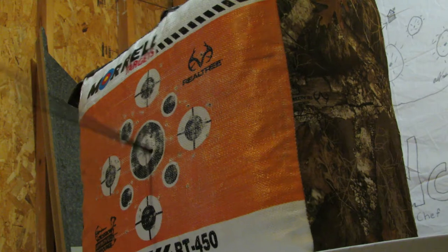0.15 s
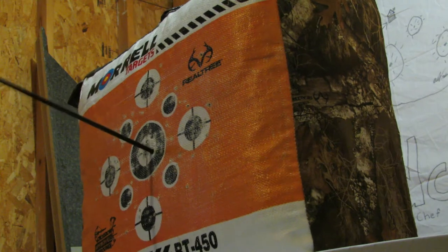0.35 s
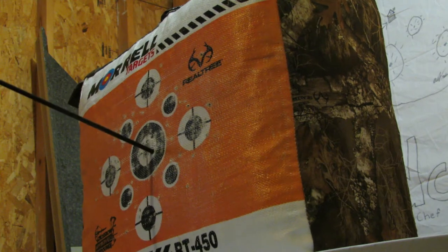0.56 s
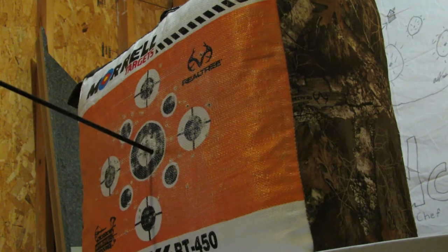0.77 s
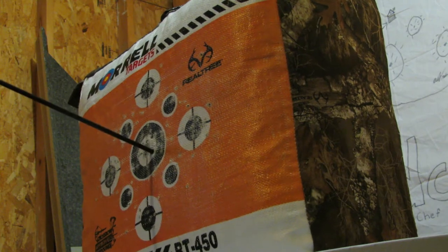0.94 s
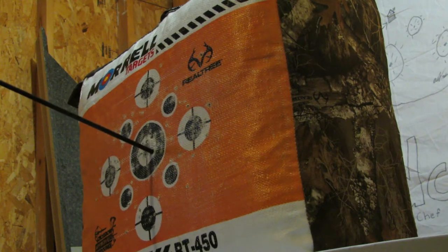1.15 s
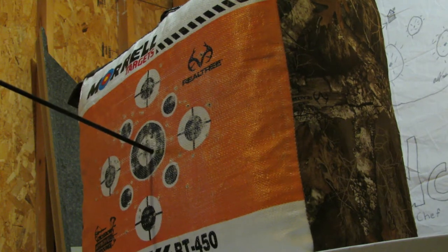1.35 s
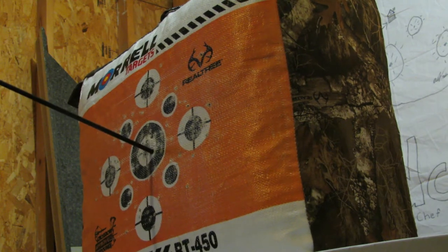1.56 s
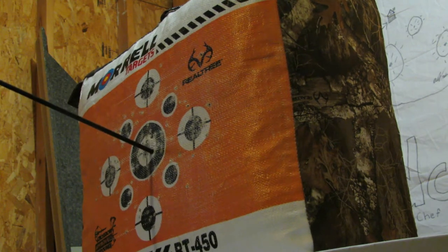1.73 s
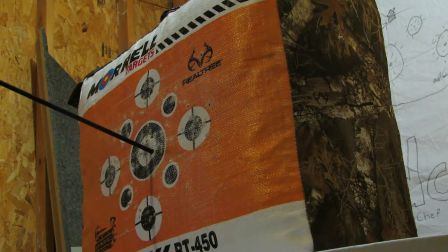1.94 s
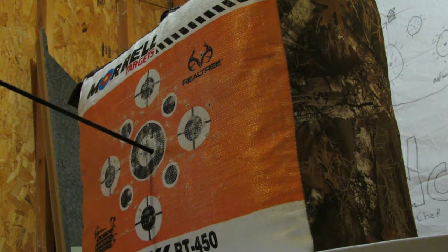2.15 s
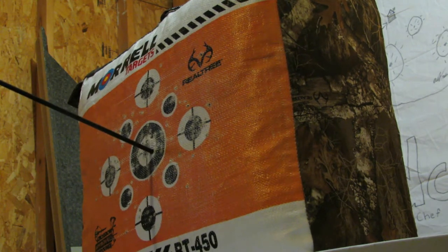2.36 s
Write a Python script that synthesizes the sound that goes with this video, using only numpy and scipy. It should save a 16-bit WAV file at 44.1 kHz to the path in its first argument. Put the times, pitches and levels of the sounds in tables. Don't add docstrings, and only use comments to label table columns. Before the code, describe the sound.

Close stereo pickup in a plywood shed: bow snap, brief arrow whoosh, loud thumping smack with a drum-like ring, quick wall reflections, then quiet room noise slowly rising and a light cloth scuff near the end.

```python
import sys
import numpy as np
from scipy import signal
from scipy.fft import rfft, irfft
from scipy.io import wavfile
from scipy.ndimage import map_coordinates

SR = 44100
rng = np.random.default_rng(int(sys.argv[2]) if len(sys.argv) > 2 else 0)


def file_out(sig):
    cols = np.atleast_2d(sig).T
    lim = np.clip(cols, -1, 1)
    pcm = np.round(lim * 32767).astype(np.int16)
    wavfile.write(sys.argv[1], SR, pcm)


def gain_from_db(level_db):
    decades = np.asarray(level_db, float) / 20
    return 10 ** decades


N = 110250
T = np.arange(N) / SR

# frequency in Hz, spectral level in dB.
FLOOR_TONE = [(25, -11.5), (64, 0.5), (240, -6), (800, -14.5), (2500, -23), (7300, -28.5), (9000, -27),
              (16000, -35.5)]
# frequency in Hz, correlation from -1 to 1.
FLOOR_ALIKE = [(60, -0.43), (130, -.68), (290, -.68), (640, -.56), (1410, -.42), (3100, -.1), (7000, .3),
               (7500, 0.97)]
FLOOR_DB, WHINE_DB, HUM_DB = -54, -78, -67
WHINE_HZ, WHINE_WIDTH_HZ, HUM_HZ = 5390, 110, 59.3

# centre in seconds, length in seconds, rub level in dB, swish level in dB.
SCUFFS = [
    (2.185, .028, -57, -59),
    (2.22, .022, -54, -54),
    (2.252, .022, -54, -60),
    (2.285, .028, -55, -51),
    (2.335, .04, -58, -60),
]
# frequency in Hz, spectral level in dB.
RUB_TONE = [(200, -19), (500, -0.5), (1400, -4), (2740, -13), (5000, -30.5)]
# frequency in Hz, spectral level in dB.
SWISH_TONE = [(1500, -28), (3300, -7.5), (4800, 0), (7200, -7.5), (9000, -2.5), (13000, -8.5), (16000, -17)]
# frequency in Hz, width in Hz, level in dB.
SWISH_RINGS = [(4650, 210, -10), (5100, 180, -3)]
# frequency in Hz, correlation from -1 to 1.
SCUFF_ALIKE = [(600, 0.29), (7000, 0.22), (7500, 0.98)]

# frequency in Hz, 60 dB decay time in seconds.
ROOM_T60 = [(60, .5), (250, .45), (600, .36), (1500, .4), (4000, .37), (7500, .36), (11000, .26),
            (15000, .19)]
# frequency in Hz, correlation from -1 to 1.
ROOM_ALIKE = [(60, .85), (400, .75), (1000, 0.41), (3000, 0.17), (7000, 0.44), (7400, 0.99), (16000, 0.8)]
ROOM_GAP_S = 0.0033
BOW_WET_DB, BAG_WET_DB, BODY_WET_DB = -5, -6, -12

# time in seconds, level in dB.
RELEASE = [
    (.092, -66),
    (.0955, -46),
    (.0965, -40),
    (.101, -39),
    (.110, -35),
    (.1125, -33),
    (.114, -24.5),
    (.119, -25.5),
    (.125, -50),
]
# frequency in Hz, spectral level in dB.
RELEASE_TONE = [(35, -33), (60, -3.5), (1110, -9), (1780, -1), (5210, -5), (11000, -6.5), (16000, -22)]
# time in seconds, level in dB.
RATTLE = [
    (.116, -39.5),
    (.119, -19),
    (.127, -18),
    (.142, -24.5),
    (.160, -27),
    (.168, -35),
    (.19, -53),
]
# frequency in Hz, spectral level in dB.
RATTLE_TONE = [(150, -18), (700, -11.5), (1290, -16), (2100, -3.5), (3350, -4.5), (4410, -4), (8070, -8),
               (16000, -21.5)]
# frequency in Hz, correlation from -1 to 1.
RATTLE_ALIKE = [(300, 1), (1400, -0.4), (7000, -0.1), (15000, -0.6)]
RATTLE_PER_S, RATTLE_SCATTER_DB = 12000, 0.5
WHOOSH_FAR_HZ, WHOOSH_NEAR_HZ = 3200, 5830
WHOOSH_OCTAVES, WHOOSH_DB = 0.45, 5
WHOOSH_START_S, WHOOSH_END_S = 0.12, 0.14
# start in seconds, level in dB, push length in seconds.
KNOCKS = [
    (0.1172, -12.5, .0004),
    (0.1185, -15.5, 0.00017),
    (0.121, -10, 0.00017),
]
# frequency in Hz, level in dB, 60 dB decay time in seconds.
LIMB_MODES = [(95, -17.5, .08), (304, -9.5, .04), (1100, -26.5, 0.022), (2800, -7.5, .008)]
BOW_PAN_DB, BOW_LAG_S = 6.5, 0.0002

# frequency in Hz, level in dB, 60 dB decay time in seconds, left minus right in dB.
BAG_MODES = [(69, -30, 0.3, 5.5), (96.7, -30, 0.27, 5), (143.2, -33.5, 0.31, 3), (240, -33.5, 0.28, 2),
             (356.8, -17, .22, 5.5), (385, -27, .4, 3), (417.6, -15, .17, 5.5), (690, -26.5, 0.037, 1),
             (878, -27.5, 0.26, 1.5), (1245, -27, .08, 1), (1540, -23, 0.043, -1.5)]
BAG_SWELL_S, BAG_ROUGH_DB = 0.002, 2.5
HIT_S, PUSH_S, PUSH_DB, REBOUND_DB = 0.16365, 0.00031, 3.5, -3.5
CRACK_DB, CRACK_T60_S = -11, 0.012
# frequency in Hz, spectral level in dB.
CRACK_TONE = [(1500, -20), (5000, -9), (9000, 1), (12000, -5.5), (16000, -16.5)]
# arrival in seconds, level in dB.
SLAPBACK = [
    (0.1792, -17),
    (.1873, -16.5),
    (.1905, -20),
    (.1995, -22),
    (.203, -21.5),
]

LOW_CUT_HZ, TOP_HZ, CEILING = 45, 15750, 1.1
DUCK_S, DUCK_DB, DUCK_ATTACK_S, DUCK_HOLD_S, DUCK_RELEASE_S = 0.094, -12, 0.003, 0.62, 0.52


def read(table, hz):
    a = np.array(table, float)
    return np.interp(np.log(np.maximum(hz, 1)), np.log(a[:, 0]), a[:, 1])


def spectrum(table):
    return lambda f: gain_from_db(read(table, f))


def flat(f):
    return 1 + 0 * f


def bump(f, hz, octaves):
    return np.exp(-(np.log2(np.maximum(f, 1) / hz) / octaves) ** 2)


def resonance(f, hz, width):
    return 1 / (1 + (2 * (f - hz) / width) ** 2)


def shape(x, gain):
    return irfft(rfft(x) * gain(np.fft.rfftfreq(N, 1 / SR)), N)


def colour(x, gain):
    y = shape(x, gain)
    centre = np.atleast_2d(y).mean(axis=0)
    return y / np.sqrt(np.mean(centre ** 2))


def noise(gain):
    return colour(rng.standard_normal(N), gain)


def pair(gain, alike):
    c = np.clip(read(alike, np.fft.rfftfreq(N, 1 / SR)), -.9, .998)
    weights = np.sqrt([1 + 0 * c, (1 - c) / (1 + c)])
    mid, side = rfft(rng.standard_normal((2, N))) * weights
    return colour(irfft(np.array([mid + side, mid - side]), N), gain)


def curve(rows):
    a = np.array(rows)
    return gain_from_db(np.interp(T, a[:, 0], a[:, 1], -200, -200))


def push(start, length):
    u = (T - start) / length
    return np.where((u > 0) & (u < 1), np.sin(np.pi * np.clip(u, 0, 1)) ** .6, 0)


def ring(start, hz, db, t60):
    u = np.maximum(T - start, 0)
    return gain_from_db(db - 60 * u / t60) * np.sin(2 * np.pi * hz * u)


def walk(rate):
    return noise(lambda f: np.exp(-(f / rate) ** 2))


def floor():
    low = pair(spectrum(FLOOR_TONE), FLOOR_ALIKE)
    bass = shape(low, lambda f: 1 / (1 + (f / 350) ** 2))
    air = bass * gain_from_db(1.6 * walk(9)) + (low - bass) * gain_from_db(0.32 * walk(6))
    whine = noise(lambda f: resonance(f, WHINE_HZ, WHINE_WIDTH_HZ))
    hum = np.sin(2 * np.pi * HUM_HZ * T)
    return gain_from_db(FLOOR_DB) * air + gain_from_db(WHINE_DB) * whine + gain_from_db(HUM_DB) * hum


def scuff():
    def swish_gain(f):
        rings = sum(gain_from_db(db) * resonance(f, hz, width) for hz, width, db in SWISH_RINGS)
        return gain_from_db(read(SWISH_TONE, f)) + rings

    rub = pair(spectrum(RUB_TONE), SCUFF_ALIKE)
    swish = pair(swish_gain, SCUFF_ALIKE)
    strokes = 0
    for centre, length, rub_db, swish_db in SCUFFS:
        stroke = np.exp(-((T - centre) / length) ** 2)
        strokes = strokes + stroke * (gain_from_db(rub_db) * rub + gain_from_db(swish_db) * swish)
    return strokes * gain_from_db(0.99 * walk(123))


def room():
    diffuse, out = pair(flat, ROOM_ALIKE), 0
    for hz in 40 * 2 ** (np.arange(18) / 2):
        band = colour(diffuse, lambda f: bump(f, hz, .4)) * np.sqrt(hz)
        out = out + band * gain_from_db(-60 * T / read(ROOM_T60, hz))
    out = out * np.clip(T / ROOM_GAP_S, 0, 1) ** 2
    return out[:, :SR] / np.sqrt(np.sum(out ** 2) / 2)


def release():
    return curve(RELEASE) * noise(spectrum(RELEASE_TONE))


def limbs():
    out = 0
    for start, db, length in KNOCKS:
        recoil = 1.2 * push(start + length, length)
        modes = sum(ring(start, *mode) for mode in LIMB_MODES)
        out = out + gain_from_db(db) * (push(start, length) - recoil + modes)
    return out


def rattle():
    clicks = (rng.random(N) < RATTLE_PER_S / SR) * gain_from_db(RATTLE_SCATTER_DB * rng.exponential(size=N))
    spread = clicks * pair(flat, RATTLE_ALIKE)

    def whoosh(hz):
        return colour(spread, lambda f: gain_from_db(read(RATTLE_TONE, f) + WHOOSH_DB * bump(f, hz, WHOOSH_OCTAVES)))

    share = np.interp(T, (WHOOSH_START_S, WHOOSH_END_S), [0, 1])
    moving = (1 - share) * whoosh(WHOOSH_FAR_HZ) + share * whoosh(WHOOSH_NEAR_HZ)
    return curve(RATTLE) * moving


def bag_hit():
    u = np.maximum(T - HIT_S, 0)
    smack = gain_from_db(PUSH_DB) * push(HIT_S, PUSH_S) - gain_from_db(REBOUND_DB) * push(HIT_S + PUSH_S, PUSH_S)
    fade = (u > 0) * gain_from_db(CRACK_DB - 60 * u / CRACK_T60_S)
    crack = fade * noise(spectrum(CRACK_TONE))
    slaps = 0
    for start, db in SLAPBACK:
        slaps = slaps + gain_from_db(db) * (push(start + PUSH_S, 1.5 * PUSH_S) - push(start, PUSH_S))
    return smack + crack + slaps


def bag_body():
    body = 0
    for hz, db, t60, left_right in BAG_MODES:
        mode = ring(HIT_S, hz, db, t60) * gain_from_db(BAG_ROUGH_DB * walk(28))
        body = body + mode * gain_from_db(np.array([[left_right], [-left_right]]) / 2)
    u = np.maximum(T - HIT_S, 0)
    return -body * (1 - np.exp(-u / BAG_SWELL_S))


def scene():
    shot, flight = release() + limbs(), rattle()
    hit, body = bag_hit(), bag_body()
    late = map_coordinates(shot, [np.arange(N) - BOW_LAG_S * SR], order=3)
    pan = gain_from_db(np.array([[1], [-1]]) * BOW_PAN_DB / 2)
    direct = (np.array([shot, late]) + flight) * pan + hit + body
    send = gain_from_db(BOW_WET_DB) * (shot + flight[0]) + gain_from_db(BAG_WET_DB) * hit
    send = send + gain_from_db(BODY_WET_DB) * body.mean(axis=0)
    wet = signal.fftconvolve(send[None], room(), axes=1)[:, :N]
    low_cut = signal.butter(2, LOW_CUT_HZ, "high", fs=SR, output="sos")
    heard = signal.sosfilt(low_cut, direct + wet)
    return heard * gain_from_db(-DUCK_DB) + scuff() + floor()


def band_limit(x):
    return signal.sosfilt(signal.butter(12, 16350, fs=SR, output="sos"), x)


def record(dry):
    u = np.maximum(T - DUCK_S, 0)
    recovery = np.exp(-np.maximum(u - DUCK_HOLD_S, 0) / DUCK_RELEASE_S)
    duck = (1 - np.exp(-u / DUCK_ATTACK_S)) * recovery
    held = CEILING * np.tanh(dry * gain_from_db(DUCK_DB * duck) / CEILING)
    top_cut = signal.ellip(10, .1, 45, TOP_HZ, fs=SR, output="sos")
    mix = signal.sosfiltfilt(top_cut, held)
    return band_limit(mix)


dry = scene()
out = record(dry)
file_out(out)
```